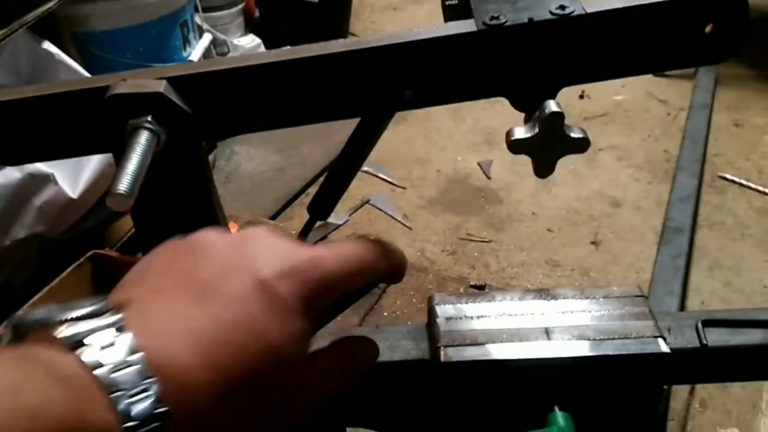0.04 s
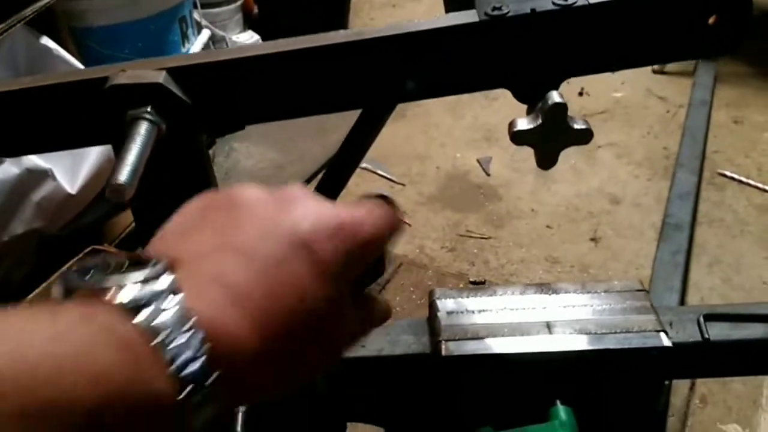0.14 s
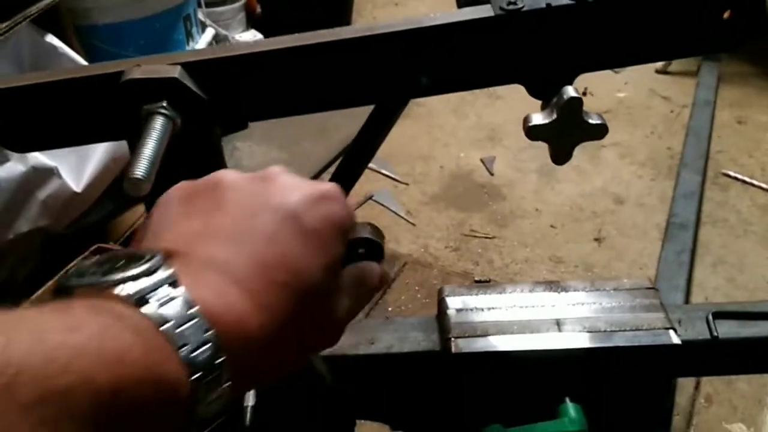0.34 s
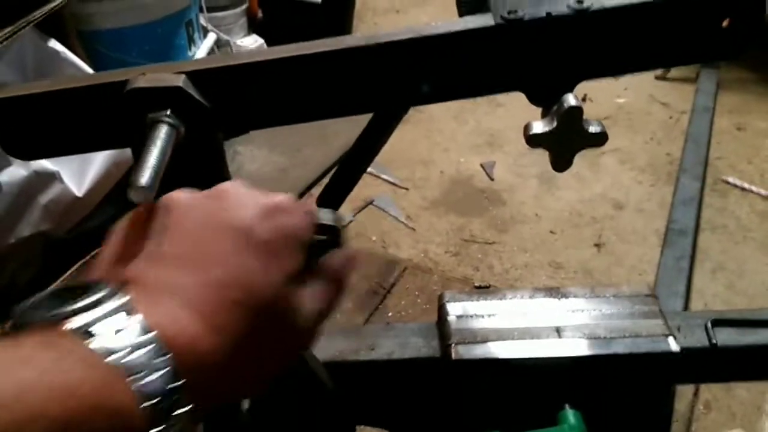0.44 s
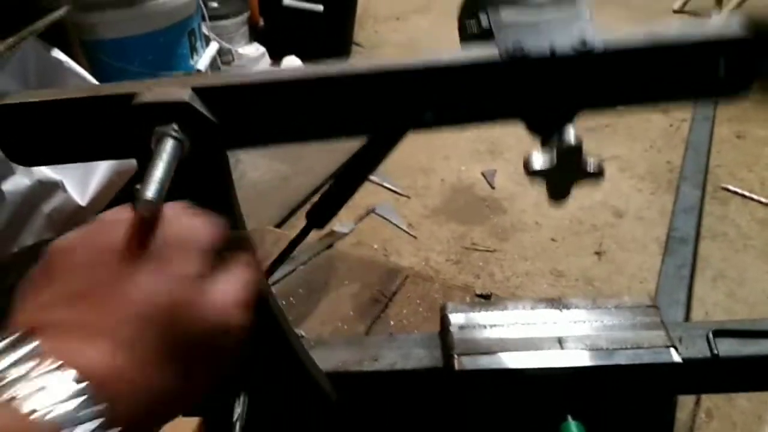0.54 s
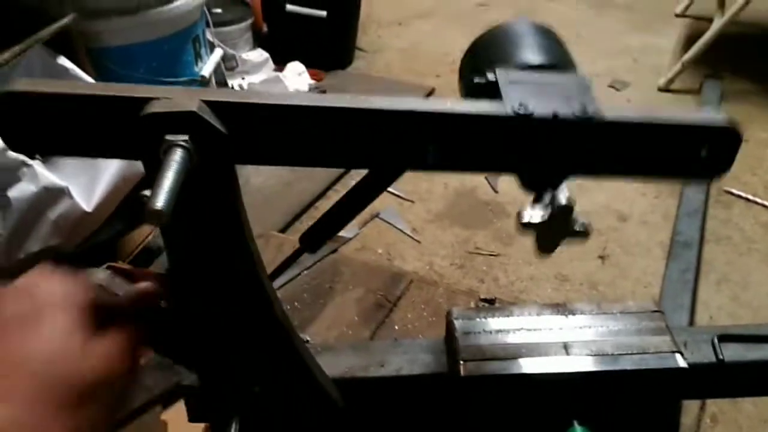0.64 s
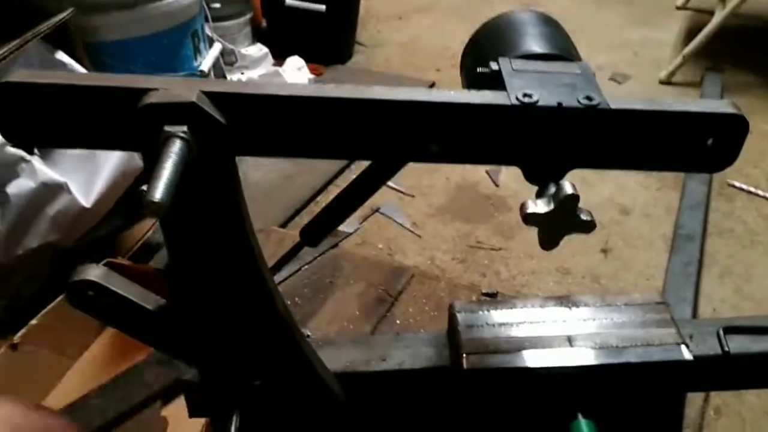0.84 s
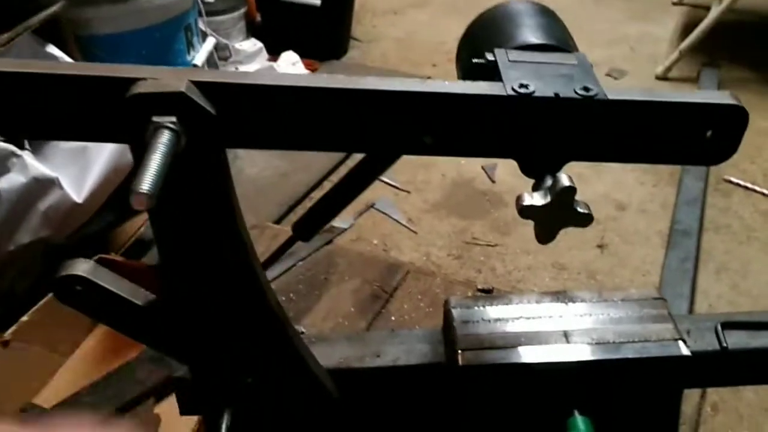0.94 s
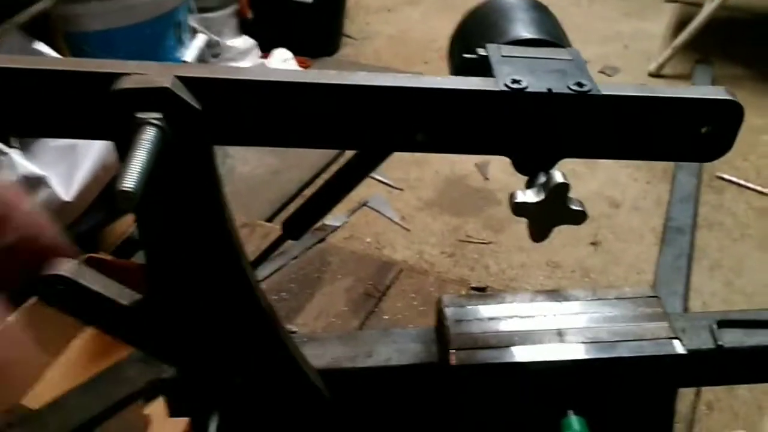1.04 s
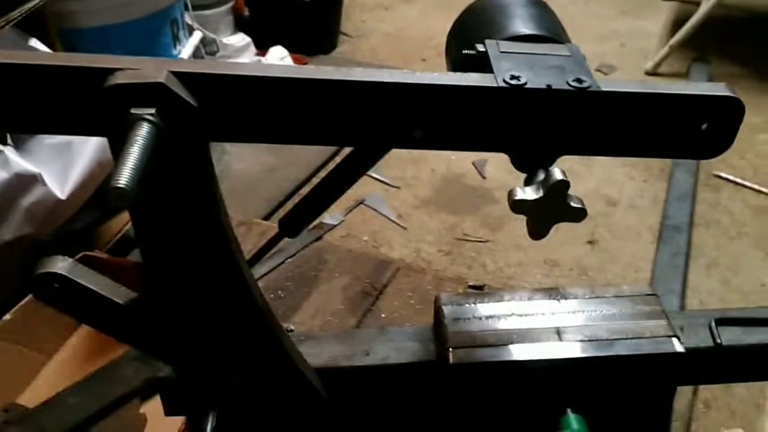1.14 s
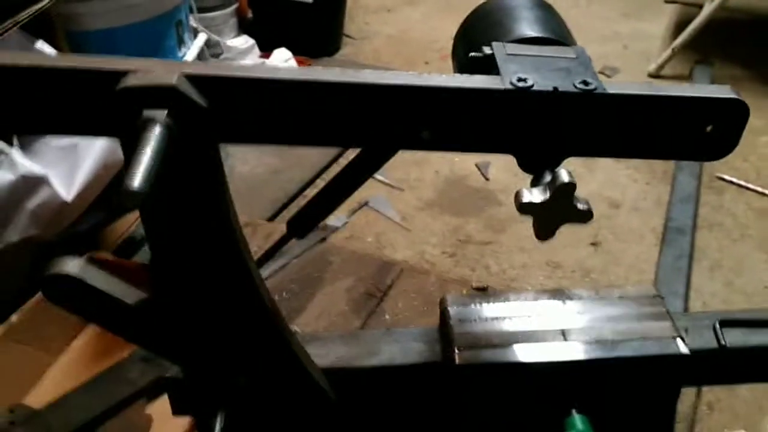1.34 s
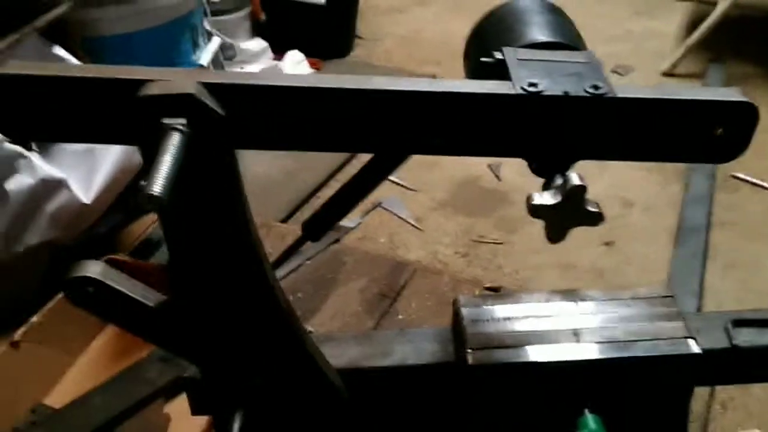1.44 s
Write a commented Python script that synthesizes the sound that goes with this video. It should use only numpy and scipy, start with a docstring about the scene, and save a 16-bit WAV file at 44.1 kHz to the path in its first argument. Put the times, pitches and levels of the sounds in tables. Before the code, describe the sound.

A steel lever releases with a sharp clack and quick ringing knocks, then faint microphone handling.

```python
"""A steel lever on a workshop frame, heard close by in a small, cluttered room on a hand-held stereo recorder.
A hand draws back the catch: it sticks and slips, lets go with a clack, and the arm knocks and settles,
each blow ringing the frame and setting the arm booming. Then the hand withdraws; right at the
microphones, fingers bump the left side of the case and scratch across the right port, over faint hiss."""
import sys
import numpy as np
from scipy import signal
from scipy.fft import rfft, irfft
from scipy.io import wavfile

SR = 44100
rng = np.random.default_rng(int(sys.argv[2]) if len(sys.argv) > 2 else 0)


def to_wav(sig):
    """Store sig (one row per channel, or 1-D mono) as 16-bit WAV at the path in sys.argv[1].

    Samples outside -1..1 are clipped; the rate is SR.
    """
    pcm = np.clip(np.atleast_2d(sig), -1, 1) * 32767
    pcm = np.round(pcm).astype(np.int16)
    wavfile.write(sys.argv[1], SR, pcm.T)  # frames by channels


N = 66150

# Levels in the tables are relative; a positive pan leans to the left microphone.
# blows on the frame (time [s], level [dB], brightness [dB/octave], crack [dB], arm boom [dB])
BLOWS = [(0.2325, -13, -2, 4, -12.5), (0.2565, -23.5, 9, -22, 14), (0.2966, -28.5, 4.5, -2, 4),
         (0.3204, -26.5, 1.5, -14, -2), (0.3454, -8, 3, 13, -2), (0.3483, 1.5, -1.5, 4, 2.5),
         (0.3548, -7.5, 8.5, -8, 12), (0.3611, -11.5, 10.5, 0.5, 2), (0.4077, -14.5, -3, -23.5, 12.5),
         (0.413, -19, -3, -20, -10), (0.42, -6, 2, 11.5, 5), (0.4232, -9, -3.5, 9, -28),
         (0.4423, -17, -7.5, -20, 16), (0.4588, -21, 9.5, 14.5, 16), (0.512, -29, 9, -10, -3),
         (0.5174, -23, -1.5, 4.5, 3.5)]
# ringing of the steel frame (frequency [Hz], level [dB], t60 [s], pan [dB])
FRAME_MODES = [(480, -8, .22, 0), (654, -3, .26, 0), (765, -11, .28, 0), (1067, -1, .23, -4),
               (1484, -7, .27, -2), (1631, -8, .25, -2), (1744, -2, .17, -5), (1812, -2, .25, -3),
               (1976, 0, .16, -7), (2207, -1, .19, -3), (2350, -1, .21, 2), (2553, -2, .18, 1),
               (3319, -5, .13, -7), (4177, -8, .12, -5)]
# low bending modes of the arm (frequency [Hz], level [dB], t60 [s])
ARM_MODES = [(72.4, -12.5, 0.15), (133, -15, 0.32), (183.6, -9.5, 0.34), (202, 1.5, 0.35),
             (272.4, -1.5, 0.16), (378.1, -6.5, 0.28)]
# spectrum of the crowd of weaker modes (frequency [Hz], level [dB])
CROWD_COLOUR = [(60, -25.5), (250, -0.5), (500, -8), (850, -7), (1300, -10), (2100, -4), (3000, -4.5),
                (4900, -11.5), (6000, -26.5), (7300, -20), (8600, -32.5), (11000, -43), (14000, -48)]
# spectrum of a blow's click and chatter (frequency [Hz], level [dB])
CRACK_COLOUR = [(100, -14), (700, -17.5), (1400, -5), (2100, 11.5), (3000, -12.5), (5000, -11.5),
                (7200, -19), (9000, -32.5), (14000, -55.5)]
# the catch sliding (time [s], level [dB])
SLIDE_LEVEL = [(0.05, -77.5), (0.15, -62.5), (0.19, -48.5), (0.225, -39.5), (0.27, -49), (0.32, -41.5),
               (0.342, -53), (0.40, -36.5), (0.46, -43.5), (0.5, -76), (0.58, -90)]
# spectrum of the scraped steel (frequency [Hz], level [dB])
SLIDE_COLOUR = [(100, -31.5), (600, -6.5), (900, -13), (1600, -12), (2180, 4.5), (2650, -12.5), (4600, -8),
                (5800, -21), (7500, -18), (9000, -38), (14000, -53.5)]
# a fingertip catching on the right port (time [s], level [dB], t60 [s], thud [dB])
SNAGS = [(1.2695, -44.5, 0.03, -9.5), (1.289, -43, 0.056, -4.5), (1.2991, -25.5, .012, -2),
         (1.3115, -24, 0.0067, -8.5), (1.321, -34.5, 0.013, -21.5), (1.3354, -30.5, 0.0031, 1)]
# resonances of the air in the port (frequency [Hz], width [Hz], level [dB])
PORT_MODES = [(2896, 250, 7), (5720, 910, -1.5), (7950, 730, -2)]
# overall tone of the scratched port (frequency [Hz], level [dB])
PORT_COLOUR = [(300, 7), (1500, -6.5), (4200, 10), (8500, 0.5), (9500, -6.5), (14000, -14.5)]
# spectrum of a snag's thud (frequency [Hz], level [dB])
THUD_COLOUR = [(100, -1.5), (500, -1), (1100, -7), (2500, 2), (5000, -16), (12000, -41)]
# soft finger bumps on the case (time [s], level [dB], pitch [Hz])
BUMPS = [(0.837, -37, 130), (0.87, -46.5, 154), (0.897, -38, 119.6), (0.988, -39.5, 130.4),
         (1.012, -29, 150), (1.041, -29, 170), (1.055, -28.5, 126), (1.128, -34.5, 132.7),
         (1.147, -35.5, 122), (1.178, -42.5, 119), (1.21, -40.5, 141.7), (1.232, -35, 112)]
# the grip shifting on the case (time [s], rub level [dB], rustle level [dB])
GRIP_LEVELS = [(0, -65.5, -82.5), (0.08, -74, -84), (0.5, -62.5, -63), (0.61, -61, -68), (0.72, -59, -63.5),
               (0.87, -61, -67.5), (1.03, -63, -70), (1.15, -65, -74), (1.24, -70.5, -80.5),
               (1.35, -68, -64), (1.42, -88.5, -77.5), (1.5, -91, -93.5)]
# spectrum of the grip's low rub (frequency [Hz], level [dB])
RUB_COLOUR = [(25, -35), (60, 0.5), (130, -14.5), (250, -2), (420, 2), (650, -6.5), (900, -25), (2000, -47)]
# spectrum of the grip's rustle (frequency [Hz], level [dB])
RUSTLE_COLOUR = [(300, -29), (900, 3), (1400, 8.5), (2000, 6.5), (2600, 9), (3300, -0.5), (4600, -0.5),
                 (6000, -10.5), (9000, -17.5), (14000, -20)]
# rumble of the fingers on the case (time [s], level [dB])
RUMBLE_LEVEL = [(0, -110), (0.1, -84), (0.82, -77), (0.86, -55.5), (0.94, -69), (1.03, -60.5),
                (1.24, -62.5), (1.4, -75), (1.5, -76.5)]
# spectrum of that rumble (frequency [Hz], level [dB])
RUMBLE_COLOUR = [(40, -3.5), (130, 0), (220, -6.5), (1500, -59.5)]
# skin brushing near the ports (peak time [s], level [dB], half length [s], pan [dB])
BRUSHES = [(1.049, -65, 0.011, 5), (1.126, -64.5, 0.013, 14.5), (1.172, -69.5, 0.013, 14),
           (1.359, -72.5, 0.087, -7.5)]
# spectrum of the brushing skin (frequency [Hz], level [dB])
BRUSH_COLOUR = [(1500, -29), (3000, 5.5), (4500, -12.5), (7000, -3), (9500, -11), (14000, -14)]

FRAME_DB, ARM_DB, CROWD_DB, CRACK_DB, CLICK_DB = -32.5, -30.5, -20.5, -20, -8
CROWD_LOW_T60_S, CROWD_HIGH_T60_S, CROWD_SPLIT_HZ, CRACK_T60_S = 0.24, 0.078, 3100, 0.025
FRAME_SWELL_S, ARM_SWELL_S = 0.00067, 0.002  # the heavy arm takes longer to start moving
FRAME_PAN_DB, RIGHT_MIC_LEAD_S = -0.5, 0.00006


def lever_knocks():
    """Each blow clicks and chatters, rings the frame's modes and sets the arm booming."""
    t, out = clock(), np.zeros((2, N))
    mic_time = t + np.array([[0], [RIGHT_MIC_LEAD_S]])
    swell = 1 - np.exp(-t / FRAME_SWELL_S)  # the ringing spreads through the frame
    modes = np.array([undb(db) * pan(pan_db) * fade(0, t60) * np.sin(2 * np.pi * hz * mic_time)
                      for hz, db, t60, pan_db in FRAME_MODES])
    octaves = np.log2(np.array(FRAME_MODES)[:, 0] / 2000)
    arm = sum(undb(db) * fade(0, t60) * np.sin(2 * np.pi * hz * t) for hz, db, t60 in ARM_MODES)
    arm *= 1 - np.exp(-t / ARM_SWELL_S)
    wash = white()
    low = signal.sosfiltfilt(signal.butter(2, CROWD_SPLIT_HZ, fs=SR, output="sos"), wash)
    high = wash - low
    crowd = undb(CROWD_DB) * swell * (low * fade(0, CROWD_LOW_T60_S) + high * fade(0, CROWD_HIGH_T60_S))
    chatter = undb(CRACK_DB) * fade(0, CRACK_T60_S)
    click = undb(CLICK_DB) * (t == 0)
    for start, db, bright_db, crack_db, boom_db in BLOWS:
        crack = undb(crack_db) * shaped(chatter * white() + click, CRACK_COLOUR, bright_db)
        clack = pan(FRAME_PAN_DB) * (shaped(crowd, CROWD_COLOUR, bright_db) + crack)
        ring = np.tensordot(undb(FRAME_DB + bright_db * octaves), modes, 1)
        boom = undb(ARM_DB + boom_db) * arm
        out += undb(db) * delayed(clack + swell * (ring + boom), start)
    return out


def catch_slide(ring_t60=.04, squeak_hz=2170, squeak_db=-7, squeak_t60=.035):
    """Steel sticks and slips on steel as the catch moves, with a faint squeak."""
    steel = noise(SLIDE_COLOUR) * fade(0, ring_t60)
    steel += undb(squeak_db) * fade(0, squeak_t60) * np.sin(2 * np.pi * squeak_hz * clock())
    slips = grains(per_s=3200, scatter_db=1)
    return pan(FRAME_PAN_DB) * curve(SLIDE_LEVEL) * unit(through(slips, steel))


def port_scratch(start_s=1.298, end_s=1.337, drag_db=-43, snap_db=-5, leak_db=-30, left_db=-19):
    """A fingertip drags over the right microphone port, ringing the air in it, and snaps off the edge."""
    t, f = clock(), freqs()
    drag = undb(drag_db) * (t > start_s) * (t < end_s) * grains(per_s=2400, scatter_db=4.1)
    dull, thuds = noise(THUD_COLOUR), np.zeros((2, N))
    for start, db, t60, thud_db in SNAGS:
        drag += undb(db) * fade(start, t60) * rng.choice([-1, 1], N)
        thuds += undb(db + thud_db) * fade(start, t60) * dull
    drag[int(SNAGS[-1][0] * SR)] += undb(snap_db)
    port = sum(undb(db) / (1 + 1j * (f ** 2 - hz ** 2) / (f * width)) for hz, width, db in PORT_MODES)
    port += undb(leak_db) * f / (f + PORT_MODES[0][0])
    port /= np.sqrt(np.mean(abs(port) ** 2))
    air = shaped(irfft(rfft(drag) * port, N), PORT_COLOUR)
    return undb([[left_db], [0]]) * air + undb(-6.5) * pan(2.4) * thuds


def finger_bumps(rise_s=0.0022, right_db=-36):
    """Soft fingers thump the left side of the case, barely reaching the right microphone."""
    out = np.zeros((2, N))
    for start, db, hz in BUMPS:
        age = np.maximum(clock() - start, 0)
        pulse = age / rise_s * np.exp(1 - age / rise_s)
        out += undb([[db], [db + right_db]]) * pulse * np.sin(2 * np.pi * hz * age)
    return out


def grip_noise():
    """The grip shifts on the recorder's case, which rubs, rustles and rumbles."""
    rub = pan(3) * curve(GRIP_LEVELS, column=1) * noise(RUB_COLOUR) * flicker(per_s=28)
    rustle = pan(1) * curve(GRIP_LEVELS, column=2) * noise(RUSTLE_COLOUR) * flicker(per_s=60)
    rumble = pan(14.5) * curve(RUMBLE_LEVEL) * noise(RUMBLE_COLOUR)
    return rub + rustle + rumble


def skin_brushes():
    """Skin brushes past the microphone ports in faint swells of hiss."""
    skin = noise(BRUSH_COLOUR)
    return sum(undb(db) * pan(pan_db) * np.exp(-.5 * ((clock() - peak) / half) ** 2) * skin
               for peak, db, half, pan_db in BRUSHES)


def workshop_room(sound, first_echo_s=.008, t60=0.39, level_db=-19):
    """The small, cluttered room returns a short, diffuse tail to the microphones."""
    tail = rng.standard_normal((2, N)) * fade(first_echo_s, t60)
    tail /= np.sqrt(np.sum(tail ** 2) / 2)
    return undb(level_db) * through(sound, tail)


def undb(db):
    """Decibels to gain."""
    return 10 ** (np.asarray(db) / 20)


def unit(x):
    """Scale to rms 1."""
    return x / np.sqrt(np.mean(x ** 2))


def pan(db):
    """Microphone gains for a left-minus-right level difference."""
    return undb(np.array([[db], [-db]]) / 2)


def clock():
    """Time of every sample."""
    return np.arange(N) / SR


def freqs():
    """Frequency of every spectral bin."""
    return np.maximum(np.arange(N // 2 + 1) * SR / N, 1)


def curve(table, column=1):
    """Gain over time from a dB column."""
    rows = np.array(table)
    return undb(np.interp(clock(), rows[:, 0], rows[:, column]))


def fade(start, t60):
    """Exponential decay from a given moment."""
    age = clock() - start
    return (age >= 0) * np.exp(-np.log(1000) * np.maximum(age, 0) / t60)


def flicker(per_s, depth_db=2):
    """Randomly wavering gain."""
    knots = rng.standard_normal(256)
    return undb(-depth_db * np.interp(clock() * per_s, np.arange(len(knots)), knots))


def grains(per_s, scatter_db):
    """Random stick-slip clicks of uneven size."""
    slips = rng.random(N) < per_s / SR
    return unit(slips * rng.choice([-1, 1], N) * undb(scatter_db * rng.exponential(size=N)))


def white(widen_hz=1110):
    """Stereo noise, alike at both microphones in the bass and unrelated in the treble."""
    f = freqs()
    mid, side = np.exp(2j * np.pi * rng.random((2, len(f))))
    return unit(irfft(mid + np.array([[1], [-1]]) * side * f / (f + widen_hz), N))


def noise(colour):
    """Coloured stereo noise."""
    return unit(shaped(white(), colour))


def shaped(x, colour, tilt_db=0):
    """Causal filter of unit power from (frequency [Hz], level [dB]) points, tilted per octave."""
    f, points = freqs(), np.array(colour)
    db = np.interp(np.log(f), np.log(points[:, 0]), points[:, 1])
    db += tilt_db * np.log2(np.maximum(f, 500) / 2000)
    gain = undb(db) * np.minimum(f / points[0, 0], 1)
    cepstrum = irfft(np.log(unit(gain)), N)
    fold = np.r_[1, np.full(N // 2 - 1, 2), np.zeros(N - N // 2)]  # gives minimum phase
    return irfft(rfft(x) * np.exp(rfft(cepstrum * fold)), N)


def through(x, response):
    """Pass a sound through a stereo impulse response."""
    return signal.fftconvolve(np.atleast_2d(x), response, axes=1)[:, :N]


def delayed(x, start):
    """The same sound, beginning at a given moment."""
    return np.pad(x, ((0, 0), (int(start * SR), 0)))[:, :N]


def scene(lever_pan_db=-0.5, hiss_db=-77):
    """The lever stands a little to the right in the room; the handling is dry, on the recorder itself."""
    lever = pan(lever_pan_db) * (lever_knocks() + catch_slide())
    room = workshop_room(lever)
    handling = finger_bumps() + grip_noise() + skin_brushes() + port_scratch()
    hiss = undb(hiss_db) * rng.standard_normal((2, N))
    return lever + room + handling + hiss


def record(dry, low_cut_hz=45, top_hz=14300):
    """The recorder thins the deep bass and cuts the top."""
    thinned = signal.sosfilt(signal.butter(2, low_cut_hz, "highpass", fs=SR, output="sos"), dry)
    return signal.sosfilt(signal.ellip(10, .2, 70, top_hz, fs=SR, output="sos"), thinned)


dry = scene()
out = record(dry)
to_wav(out)
```